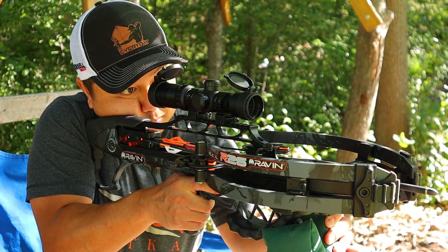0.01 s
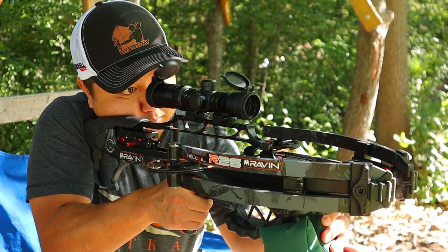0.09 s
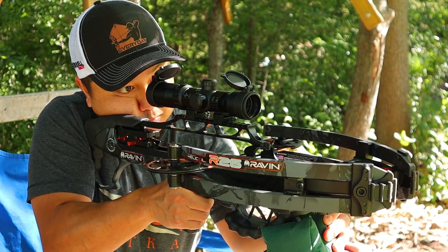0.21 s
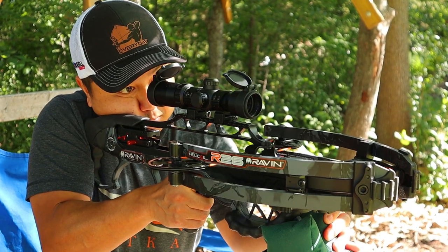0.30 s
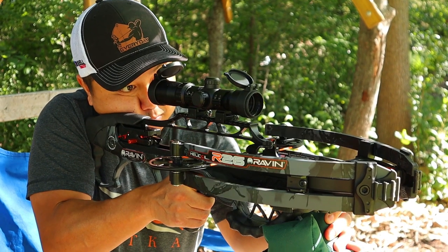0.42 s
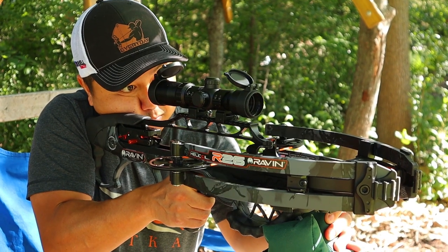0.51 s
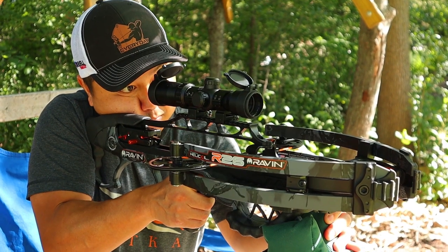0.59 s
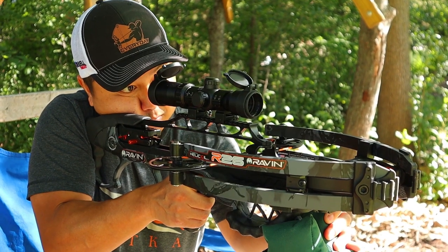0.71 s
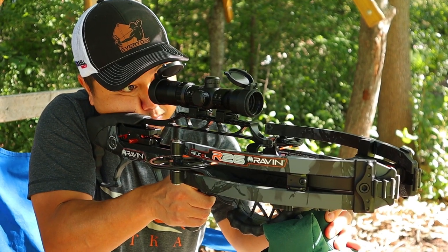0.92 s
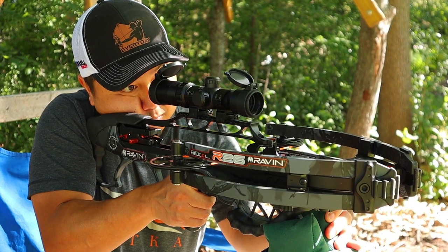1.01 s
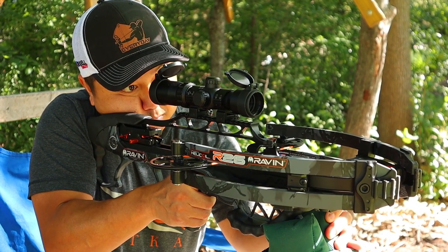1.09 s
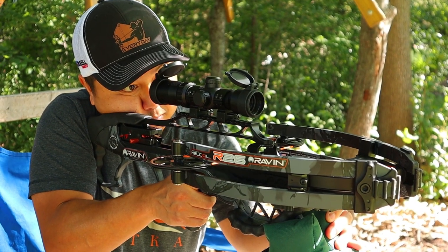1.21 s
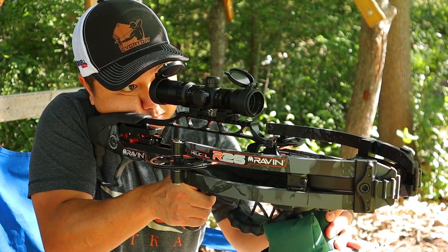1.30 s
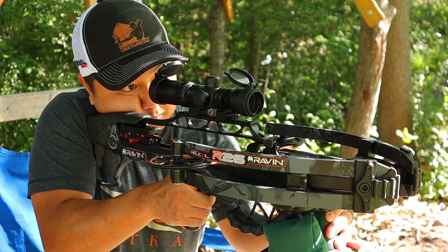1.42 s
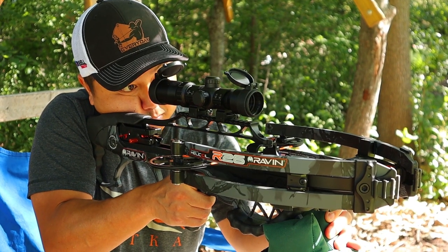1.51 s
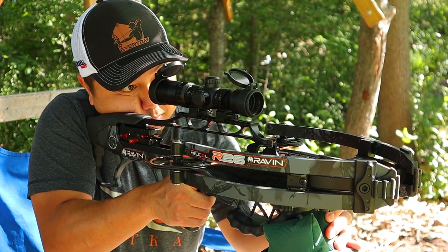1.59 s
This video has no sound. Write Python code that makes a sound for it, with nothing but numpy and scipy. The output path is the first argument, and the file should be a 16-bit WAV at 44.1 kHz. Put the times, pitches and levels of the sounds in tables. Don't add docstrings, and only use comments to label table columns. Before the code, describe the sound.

A crossbow fires very close at about 0.2 s: a loud, slightly clipped latch snap, string slap, ringing frame and rattling loose parts. At 0.42 s the bolt cracks a distant target, with a dull thud at 0.44 s and a short scattered echo from trees. Faint tyre hiss runs throughout; from about 0.6 s a low engine drone swells, sinking in pitch until 1.65 s.

```python
import sys
import numpy as np
from scipy import signal
from scipy.io import wavfile
from scipy.ndimage import uniform_filter1d, map_coordinates

SR = 44100
rng = np.random.default_rng(int(sys.argv[2]) if len(sys.argv) > 2 else 0)


def magnitude_from_level(level_db):
    exponent = np.asarray(level_db, float) / 20
    return 10 ** exponent


def wav_record(signal):
    frames = np.transpose(np.atleast_2d(signal))
    bounded = np.clip(frames, -1, 1)
    quanta = np.round(bounded * 32767).astype(np.int16)
    wavfile.write(sys.argv[1], SR, quanta)


N = 72765


def unit(x):
    return x / np.sqrt(np.mean(x ** 2) + 1e-20)


def along(points, hz):
    point_hz, value = np.transpose(points)
    return np.interp(np.log(hz + 1), np.log(point_hz + 1), value)


def curve(rows):
    return np.interp(np.arange(N) / SR, *np.transpose(rows))


def wobble(rate_hz):
    knots = rng.standard_normal(int(N * rate_hz / SR) + 4)
    return map_coordinates(knots, [np.arange(N) * rate_hz / SR])


def since(start_s):
    return np.maximum(np.arange(N) / SR - start_s, 0)


def rush(spectrum, patchy_db):
    hz, _, bins = signal.stft(rng.standard_normal(N + 2048), SR, nperseg=2048)
    patches = uniform_filter1d(rng.standard_normal(bins.shape), 16, 0)
    patches = unit(uniform_filter1d(patches, 3, 1))
    gain_db = along(spectrum, hz)[:, None] + patchy_db * patches
    return unit(signal.istft(bins * magnitude_from_level(gain_db), nperseg=2048)[1][:N])


def ring(start_s, modes, rise_s, scatter_db=0):
    t = since(start_s)
    out = np.zeros(N)
    for pitch_hz, level_db, t60_s in modes:
        decay_db = level_db + scatter_db * rng.normal() - 60 * t / t60_s
        out += magnitude_from_level(decay_db) * np.sin(2 * np.pi * pitch_hz * t)
    return (1 - np.exp(-t / rise_s)) * out


def knock(peak_s, modes, swell_s, fade_s):
    t = np.arange(N) / SR - peak_s
    shape = np.exp(-(t / np.where(t < 0, swell_s, fade_s)) ** 2)
    return shape * sum(magnitude_from_level(level_db) * np.cos(2 * np.pi * pitch_hz * t) for pitch_hz, level_db in modes)


BLOW_RISE_S = 0.00023
# start_s, level_db, crack_db
BLOWS = [
    (0.208, 1.5, -15.5),
    (0.2139, 1, -5),
    (0.2183, -5.5, -21.5),
    (0.2212, -5.5, -27.5),
    (0.2297, -9, -26),
]
# pitch_hz, level_db, t60_s
RAIL_MODES = [(2620, 7, 0.0099), (3220, -2, 0.02), (2350, -5.5, 0.012), (1238, -7.5, .03), (126, -25, .08)]


def latch():
    start_s, level_db, _ = BLOWS[0]
    return magnitude_from_level(level_db) * ring(start_s, RAIL_MODES, BLOW_RISE_S)


# pitch_hz, level_db, t60_s
STRING_MODES = [(447, -16, .36), (424, -33, .4), (689, -16, .09), (870, -31, .3), (1475, -28, .25)]


def string_hum():
    return magnitude_from_level(0.9 * wobble(52)) * ring(0.214, STRING_MODES, rise_s=0.0074)


# pitch_hz, level_db, t60_s
FRAME_MODES = [(432.3, -7, .09), (958, -5.5, 0.042), (1219, -8.5, 0.032), (1408, -10.5, .045),
               (1908, -3.5, 0.035), (2267, -10, 0.032), (2458.5, -1.5, 0.056), (3248, -5, .035),
               (3800, -12, .03)]


def frame():
    frame_db = -8.5
    out = np.zeros(N)
    for start_s, level_db, _ in BLOWS[1:]:
        out += magnitude_from_level(level_db + frame_db) * ring(start_s, FRAME_MODES, BLOW_RISE_S, scatter_db=5.5)
    return out


# freq_hz, density_db_per_hz
CRACK_SPECTRUM = [(1000, -30), (3000, -10), (6000, -3), (10500, 4.5), (14000, -3), (16500, -8),
                  (20000, -31.5)]


def cracks():
    t60_s = 0.012
    out = np.zeros(N)
    for start_s, _, crack_db in BLOWS:
        t = since(start_s)
        envelope = magnitude_from_level(crack_db - 60 * t / t60_s) * (1 - np.exp(-t / BLOW_RISE_S))
        out += envelope * rush(CRACK_SPECTRUM, patchy_db=-0.5)
    return out


# freq_hz, density_db_per_hz
RATTLE_SPECTRUM = [(40, -48), (140, -13.5), (300, -19), (1000, -1), (2500, -0.5), (4000, -1), (6500, -11),
                   (16000, -24.5)]


def rattle():
    level_db, rise_s, hold_s, t60_s = -9, 0.00068, 0.0092, 0.15
    t = since(BLOWS[0][0])
    fade_db = -60 * np.maximum(t - hold_s, 0) / t60_s
    shake = (1 - np.exp(-t / rise_s)) * magnitude_from_level(level_db + fade_db)
    return shake * rush(RATTLE_SPECTRUM, patchy_db=1.5)


def crossbow():
    return latch() + string_hum() + frame() + cracks() + rattle()


HIT_S, THUD_S = 0.41932, 0.4415
# pitch_hz, level_db
FACE_MODES = [(1000, 0), (2950, -1), (5700, -10), (7400, -22), (8700, -21), (10300, -21), (12000, -17),
              (13800, -25)]
# pitch_hz, level_db
CORE_MODES = [(950, 0), (2800, -16), (5500, -24), (7800, -20)]
# pitch_hz, level_db, t60_s
BLOCK_MODES = [(910, -9, 0.025), (556, 1, 0.052), (264, -4.5, 0.067), (126, -9, 0.077)]
LATE_S = [.4265, .4308, .4455, .4492, .528]
LATE_DB = [-17, -15, -12, -17, -22]


def target():
    face_db, thud_db, block_db, block_rise_s = -10.5, -5, -22.5, 0.0012
    face = knock(HIT_S, FACE_MODES, swell_s=0.00006, fade_s=0.0011)
    thuds = np.zeros(N)
    for start_s, level_db in zip([THUD_S] + LATE_S, [0] + LATE_DB):
        thuds += magnitude_from_level(level_db) * knock(start_s, CORE_MODES, swell_s=0.0008, fade_s=0.0003)
    block = ring(THUD_S, BLOCK_MODES, block_rise_s)
    block += magnitude_from_level(-5.5) * ring(HIT_S, BLOCK_MODES, block_rise_s, scatter_db=7.5)
    return magnitude_from_level(face_db) * face - magnitude_from_level(thud_db) * thuds + magnitude_from_level(block_db) * block


# freq_hz, t60_s
TREE_DECAY = [(300, 0.15), (1000, .2), (3000, 0.37), (6000, 0.26), (12000, .25)]


def trees(start_s, colour, level_db, rise_s, hold_s, far_db):
    far_slower = 3.25
    noise = rush(colour, patchy_db=0.8) * magnitude_from_level(1.5 * wobble(400))
    hz, t, bins = signal.stft(noise, SR, nperseg=256)
    fading_s = np.maximum(t - start_s - rise_s - hold_s, 0)
    fade_db = -60 * fading_s / along(TREE_DECAY, hz)[:, None]
    fade = magnitude_from_level(fade_db) + magnitude_from_level(far_db + fade_db / far_slower)
    rise = np.clip(since(start_s) / rise_s, 0, 1)
    return magnitude_from_level(level_db) * rise * signal.istft(bins * fade, nperseg=256)[1][:N]


# freq_hz, density_db_per_hz
SHOT_COLOUR = [(120, -69.5), (200, -39.5), (401, 1), (548, -8), (851, 1.5), (1450, -8.5), (3560, -11.5),
               (16000, -34.5)]
# freq_hz, density_db_per_hz
HIT_COLOUR = [(40, -52), (100, -16), (300, 2), (550, 5.5), (1200, -3.5), (2900, 0), (5300, -8.5),
              (16000, -43.5)]


def woods():
    shot = trees(0.21, SHOT_COLOUR, level_db=-22.5, rise_s=0.011, hold_s=0.021, far_db=-6)
    hit = trees(0.4203, HIT_COLOUR, level_db=-27, rise_s=0.0012, hold_s=0.017, far_db=-9.5)
    thud = trees(THUD_S, HIT_COLOUR, level_db=-27.5, rise_s=0.00101, hold_s=0.0061, far_db=-11.5)
    return shot + hit + thud


# time_s, level_db
ROAD_LEVEL = [(0, -47), (.6, -49.5), (.95, -44.5), (1.3, -46), (1.65, -43.5)]
# freq_hz, density_db_per_hz
TYRE_SPECTRUM = [(20, -24), (60, -3.5), (140, -5), (400, -16), (1050, -5), (1900, -11.5), (4000, -24),
                 (8000, -43), (16000, -45)]


def road():
    level_db = curve(ROAD_LEVEL) + 2 + 0.74 * wobble(3.84) + 0.58 * wobble(25.27)
    return magnitude_from_level(level_db) * rush(TYRE_SPECTRUM, patchy_db=0.5)


# time_s, level_db
DRONE_LEVEL = [(0, -65), (.6, -54), (1.0, -46), (1.2, -45.5), (1.36, -45.5), (1.58, -43), (1.65, -40)]
# freq_hz, density_db_per_hz
DRONE_SPECTRUM = [(50, -30), (110, -11.5), (250, 0.5), (330, -7.5), (420, -12), (750, -17.5), (1400, -18),
                  (3000, -52.5)]
# time_s, pitch_hz
EXHAUST_PITCH = [(0, 290), (.9, 272), (1.15, 268), (1.3, 250), (1.65, 228)]


def engine():
    exhaust_db = -5
    level_db = curve(DRONE_LEVEL)
    drone = magnitude_from_level(level_db + 1.3 * wobble(25.1)) * rush(DRONE_SPECTRUM, patchy_db=0.3)
    pitch_hz = curve(EXHAUST_PITCH) + 12 * wobble(30)
    note = np.sin(2 * np.pi * np.cumsum(pitch_hz) / SR)
    return drone + magnitude_from_level(level_db + exhaust_db + 4.8 * wobble(22.4)) * note


def microphone_hiss():
    return magnitude_from_level(-79) * rng.standard_normal(N)


def scene():
    answers = woods()
    return (crossbow() + target() + answers + road() + engine() + microphone_hiss())[None]


def duck(x):
    from_db, share, back_db_per_s, lag_s = -23, 0.75, 170, 0.028
    t = np.arange(N) / SR
    level_db = 10 * np.log10(np.abs(uniform_filter1d(x[0] ** 2, 441)) + 1e-12)
    need_db = share * np.maximum(level_db - from_db, 0)
    climb_db = back_db_per_s * t
    held_db = np.maximum.accumulate(need_db + climb_db) - climb_db
    cut_db = uniform_filter1d(np.interp(t - lag_s, t, held_db), 661)
    return x * magnitude_from_level(-cut_db)


def clip(x):
    top, hardness = 1.03, 6
    return x / (1 + np.abs(x / top) ** hardness) ** (1 / hardness)


def roll_off(x):
    return signal.sosfilt(signal.butter(12, 16410, fs=SR, output="sos"), x)


def record(dry):
    x = clip(duck(dry))
    band_hz = (42, 18000)
    x = signal.sosfilt(signal.butter(2, band_hz, "bandpass", fs=SR, output="sos"), x)
    return roll_off(x)


dry = scene()
out = record(dry)
wav_record(out)
```